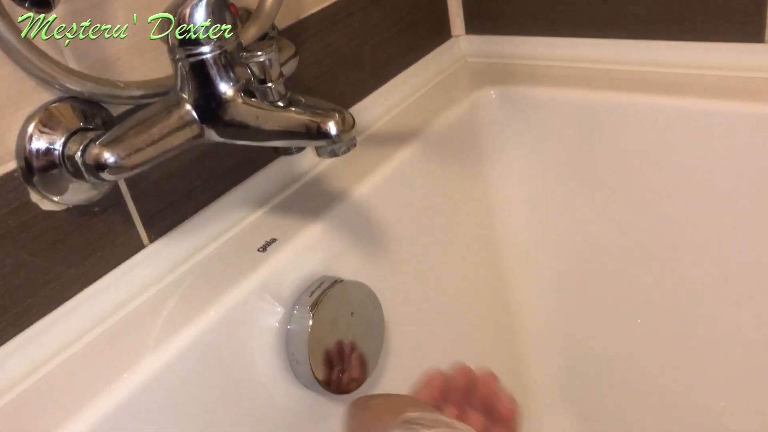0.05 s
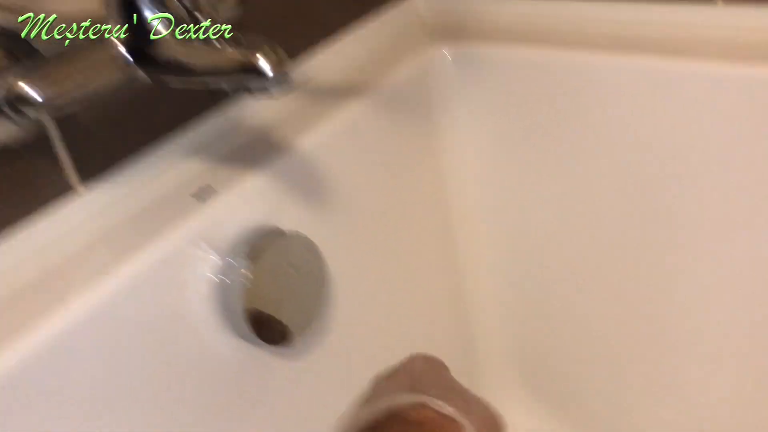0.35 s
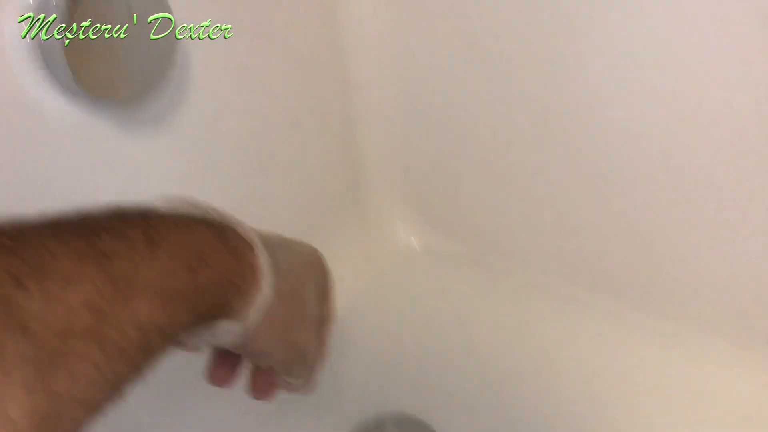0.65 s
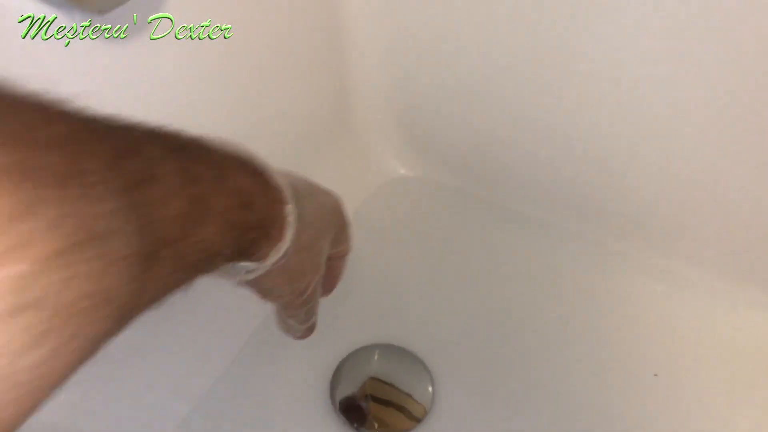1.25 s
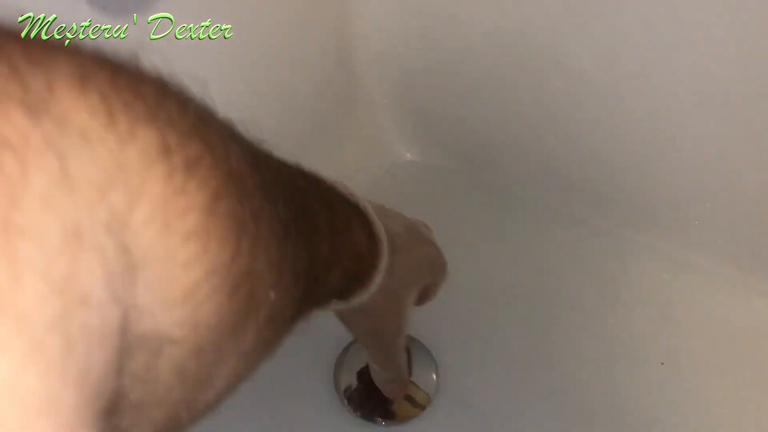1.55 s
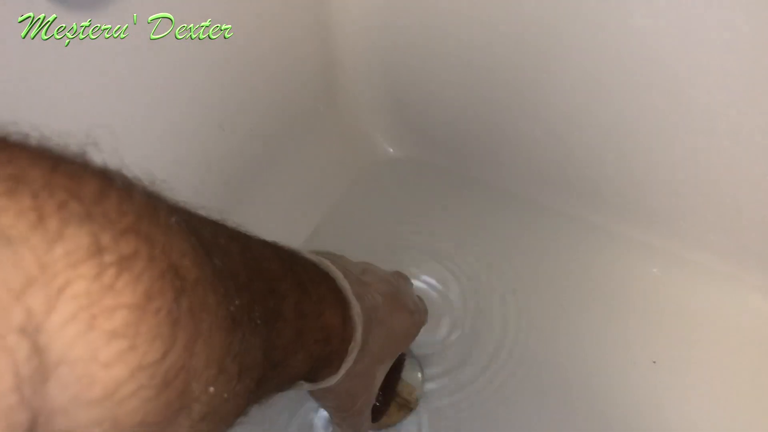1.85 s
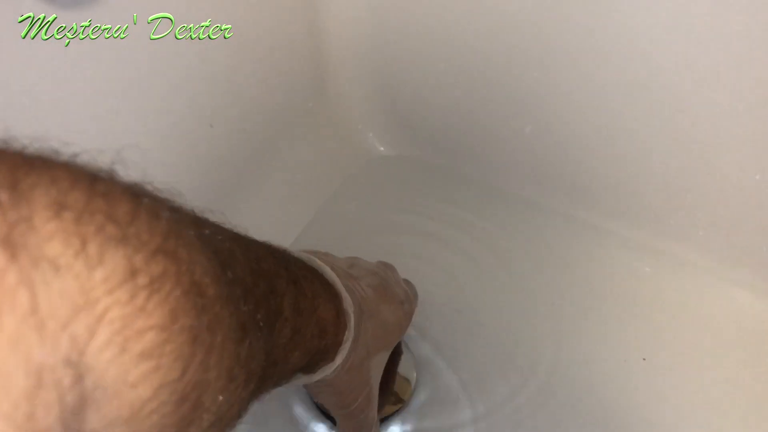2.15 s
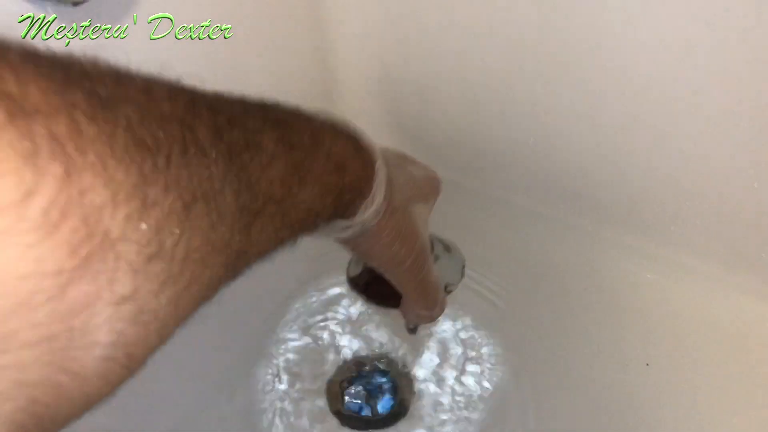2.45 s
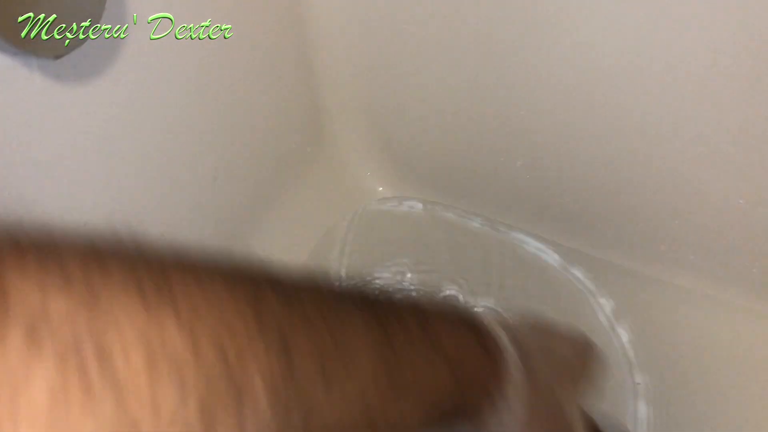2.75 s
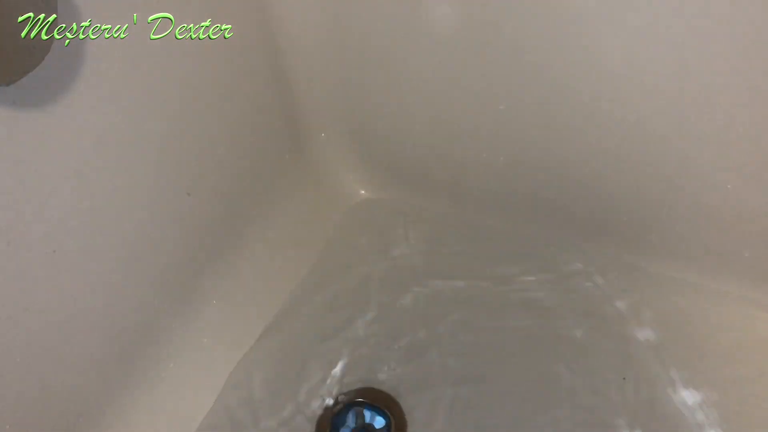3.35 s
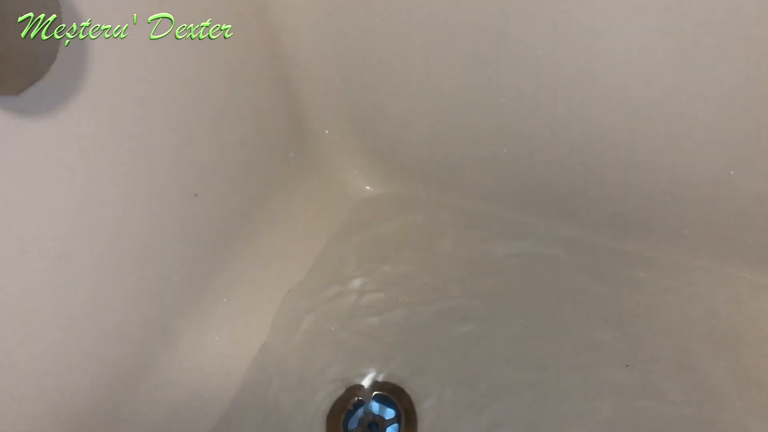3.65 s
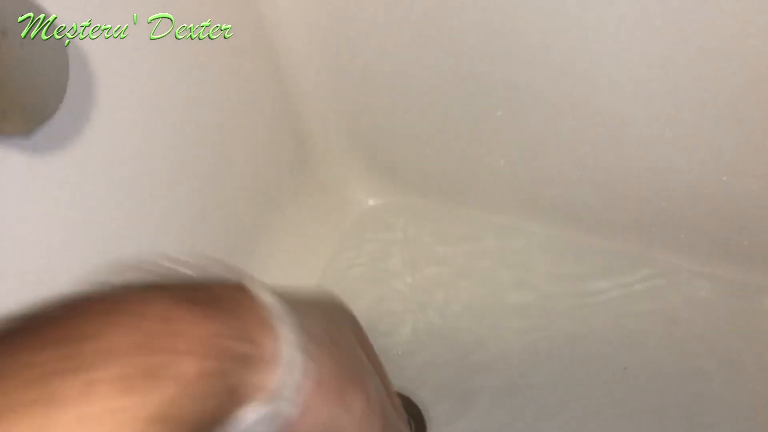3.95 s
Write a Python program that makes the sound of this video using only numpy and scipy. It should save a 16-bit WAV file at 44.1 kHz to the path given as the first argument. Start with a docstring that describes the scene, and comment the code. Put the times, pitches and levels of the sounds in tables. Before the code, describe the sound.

A metal drain plug is pulled from a shallow bath and put down. Faint lapping, drips and dull bumps fill the first two seconds. At about 2.1 seconds water rushes and gulps into the drain, followed by splashy dribbling until 3. Loud, bouncing knocks come around 3.3 and 3.8 seconds, leaving the plug ringing and the tub booming briefly in a small tiled bathroom.

```python
"""Soft lapping, drips and dull bumps: a hand reaches into a shallow bath in a small tiled bathroom.
It lifts the metal drain plug. Water rushes through the gap, trapped air gulps in the pipe,
and the raised plug dribbles. The plug is then put down on the tub with a few loud, bouncing knocks
that leave it ringing and set the shell booming."""
import sys
import numpy as np
from scipy import signal
from scipy.fft import rfft, irfft
from scipy.io import wavfile
from scipy.ndimage import uniform_filter1d

SR = 44100
rng = np.random.default_rng(int(sys.argv[2]) if len(sys.argv) > 2 else 0)


def wrap_up_sound(samples):
    """Save the sound to the file named by the first command line argument, as 16-bit audio."""
    columns = np.atleast_2d(samples).T
    # keep every value between -1 and 1, then stretch to whole-number steps
    tamed = np.clip(columns, -1, 1)
    steps = np.round(tamed * 32767).astype(np.int16)
    wavfile.write(sys.argv[1], SR, steps)


N = 176400

# Tiled room decay. Each row: frequency in Hz, t60 in seconds.
ROOM_DECAY = [(60, 0.52), (160, 0.88), (420, 0.7), (1100, 0.34), (2900, 0.34), (7700, 0.28), (15000, 0.25)]
ROOM_GAP_S, EARLY_DB, EARLY_S = 0.0053, -5, 0.028

# Source spectra. Each row: frequency in Hz, relative level in dB.
ROOM_NOISE_SPECTRUM = [(25, -33), (55, 10), (100, -3), (200, -1.5), (400, -2.5), (800, -14), (2000, -37.5),
                       (5000, -31.5), (10000, -30), (16000, -40.5)]
LAP_SPECTRUM = [(200, 3), (500, 4.5), (1100, 6.5), (2600, 1), (3600, -10.5), (5000, -7), (7500, -15.5),
                (11000, -10)]
BUMP_SPECTRUM = [(30, -40), (70, 15), (110, -7.5), (200, -2), (480, -6.5), (900, -23.5), (3000, -60)]
GURGLE_SPECTRUM = [(40, -12), (80, 4.5), (200, 0.5), (600, 1), (1000, -2.5), (2000, -10.5), (3200, -12.5),
                   (6000, -38), (12000, -48)]
SPRAY_SPECTRUM = [(200, -43), (700, 4.5), (1100, -2), (2000, 2), (3500, -2.5), (6000, -5.5), (7500, -11),
                  (9500, -37), (15500, -41)]
DROP_SPECTRUM = [(200, -1), (1000, 10), (2800, 5.5), (7500, 6.5), (11000, 2), (15500, -0.5)]
KNOCK_SPECTRUM = [(30, -44), (60, -7), (110, -11), (200, -3.5), (280, 2), (430, 3.5), (650, -1), (1500, 1),
                  (2200, -5.5), (3000, -12), (5000, -17.5), (8400, -23), (10000, -34), (15500, -49)]

# Source envelopes. Each row: time in seconds, relative level in dB.
ROOM_NOISE_ENVELOPE = [(0, -51.5), (.8, -52.5), (1.4, -58.5), (1.7, -58), (2.1, -51.5), (3.2, -58),
                       (4, -45)]
LAP_ENVELOPE = [(0, -57.5), (.5, -55), (.85, -54.5), (1.1, -55), (1.3, -52), (1.5, -53), (1.7, -57.5),
                (1.85, -54), (2.03, -81), (2.9, -72), (3.2, -68), (4, -55.5)]
SPLATTER_ENVELOPE = [(0, -64), (.4, -65), (.6, -77), (1.15, -72), (1.27, -55), (1.4, -70), (1.6, -60),
                     (1.75, -117), (1.85, -52.5), (1.95, -106), (2.28, -71), (2.38, -43), (2.48, -62),
                     (2.55, -38), (2.61, -71), (2.67, -57), (2.82, -48), (2.92, -58), (3.2, -64.5),
                     (3.6, -59), (3.67, -55.5), (4, -99)]
# Flow under the plug. Each row: time in seconds, gurgle level in dB, spray level in dB.
FLOW_ENVELOPES = [(2.07, -62, -66.5), (2.11, -38, -62), (2.165, -44, -49.5), (2.19, -24.5, -31),
                  (2.228, -25, -41), (2.265, -27.5, -41), (2.293, -29.5, -40), (2.301, -25, -19),
                  (2.345, -29.5, -24.5), (2.372, -25.5, -18), (2.395, -38, -73), (2.44, -42.5, -49.5),
                  (2.5, -46.5, -57), (2.68, -40.5, -37.5), (2.8, -45.5, -66), (2.95, -60.5, -89)]

# Arm against the tub. Each row: start in seconds, level in dB.
ARM_BUMPS = [(0.021, -12.5), (0.269, -18), (0.749, -20.5), (1.257, -2.5), (1.288, -9.5), (1.35, -14),
             (1.89, -13), (1.943, -10.5), (2.152, 2.5), (2.226, -9), (2.363, 1), (2.629, -18), (2.779, -6)]
# Drops striking water. Each row: start in seconds, level in dB, ping pitch in Hz.
DROP_HITS = [(0.116, -18.5, 4660), (0.399, -21, 3280), (0.614, -25.5, 6230), (0.804, -27.5, 6030),
             (1.036, -28.5, 6250), (1.165, -28, 8400), (1.491, -32, 6800), (1.909, -46, 5630),
             (2.111, -30, 8060), (2.373, -10, 11600), (2.392, -24, 10400), (2.418, -15, 9050),
             (2.504, -10, 6600), (2.519, -16, 4160), (2.541, -6.5, 4630), (2.549, -24, 11400),
             (2.598, -14, 13350), (2.6353, -1, 8360), (2.648, -5.5, 7020), (2.669, -6, 12200),
             (2.721, -12.5, 4600), (2.727, -7, 14300), (2.755, -14, 6040), (2.793, -14, 5800),
             (2.807, -29, 7040), (2.828, -12, 4730), (2.8385, -14.5, 11000), (2.933, -20.5, 10350),
             (2.982, -41, 12800), (3.024, -23, 7240), (3.365, -1, 11100)]
# Trapped air. Each row: start in seconds, pitch in Hz, level in dB, t60 in seconds.
AIR_BUBBLES = [(0.105, 1336, -9, 0.0072), (0.403, 2130, -13, 0.0034), (0.404, 1160, -16, 0.013),
               (0.542, 2700, -25, 0.024), (.559, 2310, -24, 0.017), (.661, 4840, -19.5, 0.007),
               (.672, 5600, -29, .003), (.719, 2370, -25, 0.023), (0.777, 2850, -21.5, 0.026),
               (0.801, 4850, -22.5, .003), (0.833, 2150, -22.5, 0.0035), (.86, 5060, -29, .002),
               (.894, 4700, -24, .003), (1.036, 6150, -29, 0.0044), (1.29, 2790, -22.5, 0.012),
               (1.456, 2300, -24, 0.017), (1.489, 2410, -19.5, 0.015), (1.821, 1120, -19, .012),
               (2.075, 1020, -22, 0.024), (2.09, 990, -14, 0.02), (2.108, 611, -4, 0.056),
               (2.126, 1890, -20, 0.02), (2.343, 937, 6.5, 0.047), (2.366, 961, 13.5, 0.094),
               (2.367, 2700, 5.5, 0.0033), (2.402, 950, -21, 0.069), (2.52, 1430, -8.5, 0.016),
               (2.542, 4540, -8.5, 0.01), (2.587, 4000, -9.5, 0.0067), (2.721, 1350, -4, 0.031),
               (2.739, 1156, -4, 0.032), (2.757, 753, -5.5, .02), (2.768, 597, 0.5, 0.084),
               (2.793, 1230, -20, .02)]
BUBBLE_RISE = 0.047

# Plug striking the tub. Each row: start in seconds, level in dB, bass tilt in dB, treble tilt in dB,
# contact ring pitch in Hz, contact ring level in dB.
PLUG_HITS = [(3.2791, -1.5, -0.5, 0, 1916, 3), (3.299, -6, -19, -7, 2110, 0),
             (3.313, -6.5, 13.5, 0, 725, 1), (3.3846, 8, -19.5, 3, 990, 2),
             (3.4004, 1, 6.5, -3.5, 1240, -4), (3.4095, -9.5, 13, -14, 950, 7),
             (3.7482, -4, 1.5, 3, 1020, 2.5), (3.7719, -6, 7, -0.5, 1500, -12),
             (3.7815, -1.5, 1, -1, 1400, -2.5), (3.9823, -24.5, -6, -2.5, 550, 7)]
# Modes of the plug and of the shell under it. Each row: frequency in Hz, level in dB, t60 in seconds.
PLUG_MODES = [(1443, -10, .3), (1801, -14, .25), (1912, -11, .22), (2266, -16, .22), (2966, -19, .3),
              (3273, -24, .3), (4630, -19, .3), (5080, -22, .16), (7230, -26, .25), (8300, -25, .18)]
TUB_MODES = [(57.5, -12.5, 0.68), (70.5, -7, 0.52), (212.8, -12, 0.36), (389, -10, 0.64), (422.3, -6, 0.27),
             (516, -6, 0.38), (564, -7.5, 0.46), (727, -11, 0.35), (891, -12, 0.15), (1099, -9, .35),
             (1370, -25, 0.3), (1633, -12.5, 0.27)]
KNOCK_DB, PLUG_DB, TUB_DB = 14, -4.5, -3


def amp(db):
    """Decibels to gain."""
    return 10 ** (np.asarray(db) / 20)


def unit(x):
    """Scale to energy 1."""
    return x / np.sqrt(np.sum(x ** 2) + 1e-20)


def lookup(points, hz):
    """Interpolate a table over log frequency."""
    f, value = np.transpose(points)
    return np.interp(np.log(hz + 1), np.log(f + 1), value)


def level(envelope, column=1):
    """Gain per sample from one dB column."""
    rows = np.array(envelope)
    return amp(np.interp(np.arange(N) / SR, rows[:, 0], rows[:, column]))


def add(mix, start_s, sound):
    """Mix a sound in at start_s."""
    part = mix[max(round(start_s * SR), 0):][:len(sound)]
    part += sound[:len(part)]


def colour(x, spectrum, size=4096):
    """Apply a minimum-phase filter of energy 1."""
    log_gain = np.log(amp(lookup(spectrum, abs(np.fft.fftfreq(size, 1 / SR)))))
    response = np.exp(np.conj(signal.hilbert(log_gain)))
    taps = np.fft.ifft(response).real[:size // 2]
    return signal.oaconvolve(x, unit(taps))[:len(x)]


def ring(hz, t60_s, rise=0., attack_s=.0003):
    """Decaying sine, energy 1; rise bends the pitch up."""
    t = np.arange(int(t60_s * SR) + 2) / SR
    envelope = (1 - np.exp(-t / attack_s)) * np.exp(-np.log(1000) * t / t60_s)
    return unit(envelope * np.sin(2 * np.pi * hz * t * (1 + rise * t / t60_s)))


def burst(decay_s):
    """Decaying noise puff, energy 1."""
    t = np.arange(SR // 4) / SR
    return unit(rng.standard_normal(len(t)) * np.exp(-t / decay_s))


def patter(per_s, spread_db):
    """Random clicks of uneven size, rms 1."""
    sizes = amp(spread_db * np.minimum(rng.exponential(1, N), 4.5))
    signs = rng.choice([-1, 1], N)
    hits = rng.random(N) < per_s / SR
    return unit(sizes * signs * hits) * np.sqrt(N)


def fizz(per_s, spread_db, t60_cycles, low_hz, high_hz, bands=30):
    """Swarm of tiny bubbles of many sizes, rms 1."""
    out = np.zeros(N)
    for hz in np.geomspace(low_hz, high_hz, bands):
        grain = ring(hz * rng.uniform(1.0, 1.04), t60_cycles / hz, BUBBLE_RISE, attack_s=1 / hz)
        out += np.sqrt(hz) * signal.oaconvolve(patter(per_s / bands, spread_db), grain)[:N]
    return unit(out) * np.sqrt(N)


def room(x):
    """Reverb only: dense early reflections off the tub walls, then the tiled room's tail."""
    t = np.arange(SR) / SR
    hz, frame_s, noise = signal.stft(rng.standard_normal(SR), SR, nperseg=256)
    decay = np.exp(-np.log(1000) * frame_s / lookup(ROOM_DECAY, hz)[:, None])
    tail = signal.istft(noise * decay, SR, nperseg=256)[1][:SR]
    spectrum = rfft(tail * (1 + amp(EARLY_DB) * np.exp(-t / EARLY_S)))
    smooth_power = uniform_filter1d(uniform_filter1d(abs(spectrum) ** 2, size=35), size=35)
    fade_in = np.clip(t / ROOM_GAP_S - .5, 0, 1)
    impulse = irfft(spectrum / np.sqrt(smooth_power)) * fade_in
    return signal.fftconvolve(x, unit(impulse[:SR * 3 // 4]))[:N]


def background(hum_hz=434, hum_db=-53.5, hum_start_s=0.71, hum_end_s=1.28):
    """Low room noise and a brief, faint hum."""
    t = np.arange(N) / SR
    noise = level(ROOM_NOISE_ENVELOPE) * colour(rng.standard_normal(N), ROOM_NOISE_SPECTRUM)
    progress = np.clip((t - hum_start_s) / (hum_end_s - hum_start_s), 0, 1)
    swell = np.sqrt(abs(np.sin(np.pi * progress)))
    return noise + amp(hum_db) * swell * np.sin(2 * np.pi * hum_hz * t)


def lapping():
    """Small bubbles round the moving arm."""
    swarm = fizz(per_s=970, spread_db=3.5, t60_cycles=24, low_hz=506, high_hz=8240)
    return level(LAP_ENVELOPE) * unit(colour(swarm, LAP_SPECTRUM)) * np.sqrt(N)


def bumps():
    """Dull tub thuds as the arm leans in and the plug comes free."""
    out = np.zeros(N)
    for start_s, db in ARM_BUMPS:
        add(out, start_s, amp(db) * burst(decay_s=0.025))
    return colour(out, BUMP_SPECTRUM)


def rush(grains_per_s=5000, spread_db=2):
    """Water gurgles under the plug, then sprays into the pipe as the gap widens."""
    gurgle = colour(patter(grains_per_s, spread_db), GURGLE_SPECTRUM)
    spray = colour(patter(grains_per_s, spread_db), SPRAY_SPECTRUM)
    return level(FLOW_ENVELOPES, column=1) * gurgle + level(FLOW_ENVELOPES, column=2) * spray


def drops(slap_db=-3.5, ping_db=-5, ping_t60_cycles=24, wet_db=-4.5):
    """Drops slap and ping amid fine splatter from the wet hand and plug."""
    splatter = fizz(per_s=1600, spread_db=3, t60_cycles=28, low_hz=2620, high_hz=15800)
    out = level(SPLATTER_ENVELOPE) * splatter
    for start_s, db, hz in DROP_HITS:
        add(out, start_s, amp(db + slap_db) * burst(decay_s=.0013))
        add(out, start_s, amp(db + ping_db) * ring(hz, ping_t60_cycles / hz, BUBBLE_RISE))
    out = colour(out, DROP_SPECTRUM)
    return out + amp(wet_db) * room(out)


def bubbles():
    """Trapped air rings: plips at the surface, deeper gulps in the drain."""
    out = np.zeros(N)
    for start_s, hz, db, t60_s in AIR_BUBBLES:
        add(out, start_s, amp(db) * ring(hz, t60_s, BUBBLE_RISE, attack_s=0.0011))
    return out


def knocks(spread_s=0.001509, scatter_db=1, wet_db=-0.5):
    """Each blow spreads through the shell, treble first, and leaves plug and tub ringing."""
    blows, ringing = np.zeros(N), np.zeros(N)
    size = SR // 4
    bin_hz = np.fft.rfftfreq(size, 1 / SR)
    dispersion = np.exp(-4j * np.pi * spread_s * np.sqrt(1000 * bin_hz))  # delay is spread_s at 1 kHz
    bending_wave = irfft(dispersion, size) * np.linspace(1, 0, size)
    for start_s, db, bass_db, treble_db, contact_hz, contact_db in PLUG_HITS:
        tilt = [(150, bass_db), (600, 0), (1800, 0), (4000, treble_db), (15000, 2 * treble_db)]
        spectrum = [(hz, band_db + lookup(tilt, hz)) for hz, band_db in KNOCK_SPECTRUM]
        scatter = amp(scatter_db) * burst(decay_s=0.0035)
        add(blows, start_s, amp(db) * colour(bending_wave / 2 + scatter, spectrum))
        contact = ring(contact_hz, t60_s=.016, attack_s=spread_s) / 2
        add(blows, start_s + spread_s / 2, amp(db + contact_db) * contact)
        for modes, body_db in [(PLUG_MODES, PLUG_DB), (TUB_MODES, TUB_DB)]:
            for hz, mode_db, t60_s in modes:
                gain = amp(db + body_db + mode_db + lookup(tilt, hz))
                onset_s = start_s + rng.random() * spread_s
                add(ringing, onset_s, gain * ring(hz, t60_s, attack_s=1 / hz))
    return amp(KNOCK_DB) * (blows + amp(wet_db) * room(blows) + ringing)


def scene(bath_db=-3.5, stir_wet_db=-3.5, bubble_wet_db=-1.5):
    """Mono mix of bath sounds, plug knocks and background."""
    stir = bumps() + rush() + lapping()
    gulps = bubbles()
    reverb = room(amp(stir_wet_db) * stir + amp(bubble_wet_db) * gulps)
    bath = stir + gulps + reverb + drops()
    return (amp(bath_db) * bath + knocks() + background())[None]


def record(dry, low_cut_hz=52.7, high_cut_hz=16200):
    """Rumble cut, hard clipping on the loudest knock, top treble cut."""
    highpass = signal.butter(6, low_cut_hz, "high", fs=SR, output="sos")
    lowpass = signal.firwin(511, high_cut_hz, window=("kaiser", 9), fs=SR)
    clipped = np.clip(signal.sosfilt(highpass, dry), -1, 1)
    return signal.oaconvolve(clipped, lowpass[None], "same")


dry = scene()
out = record(dry)
wrap_up_sound(out)
```